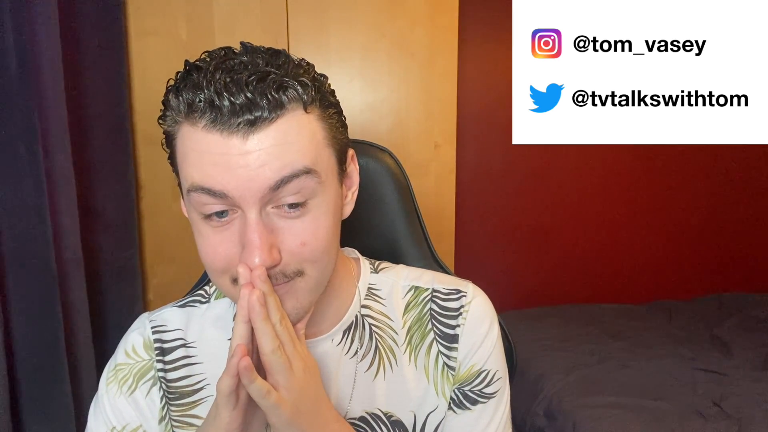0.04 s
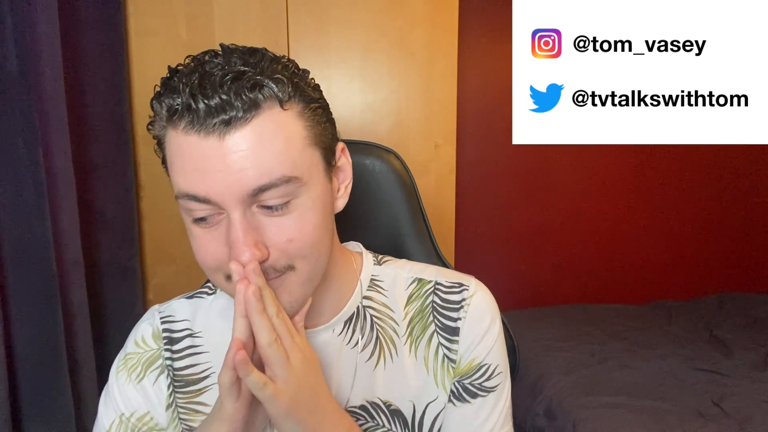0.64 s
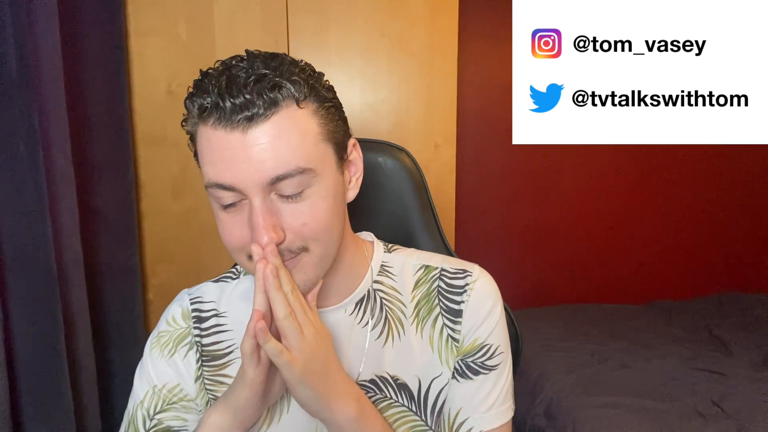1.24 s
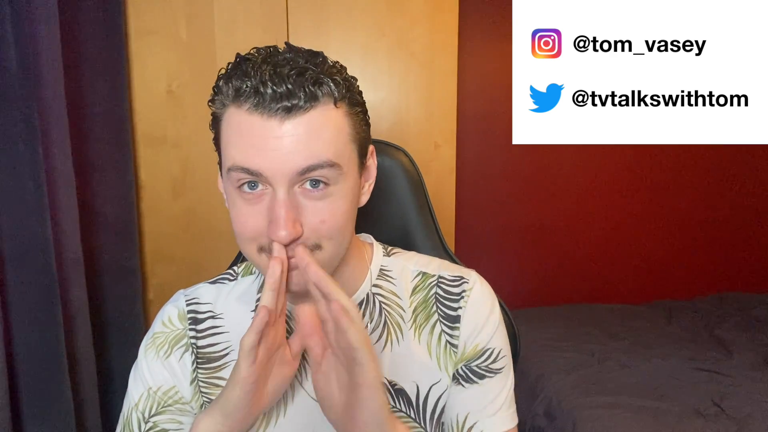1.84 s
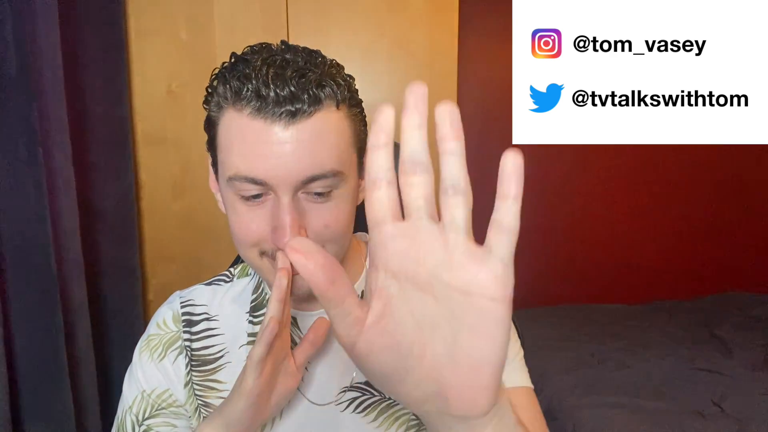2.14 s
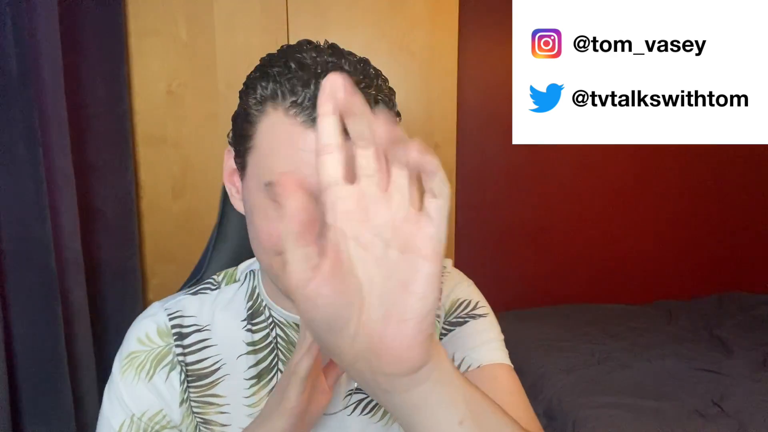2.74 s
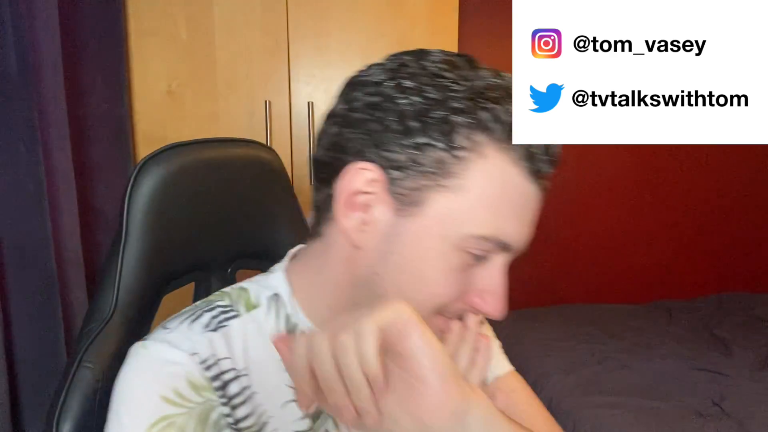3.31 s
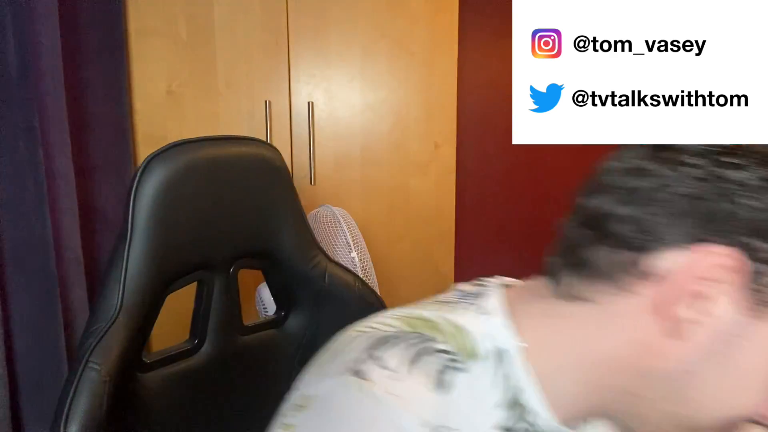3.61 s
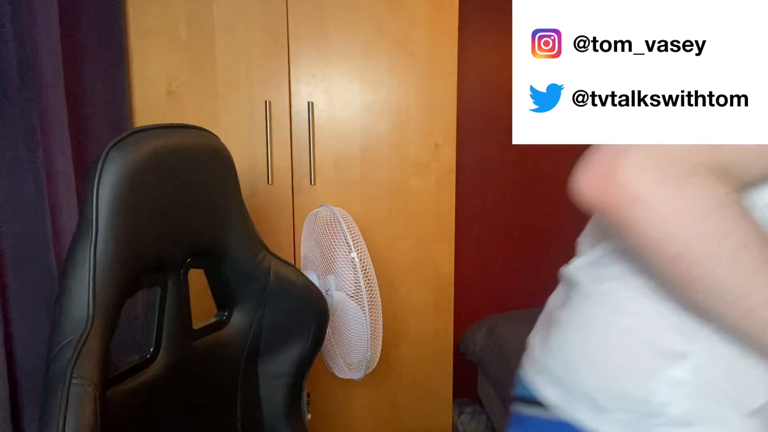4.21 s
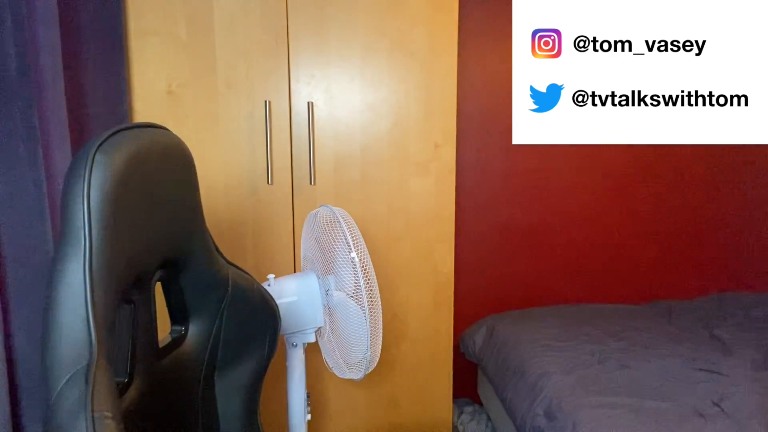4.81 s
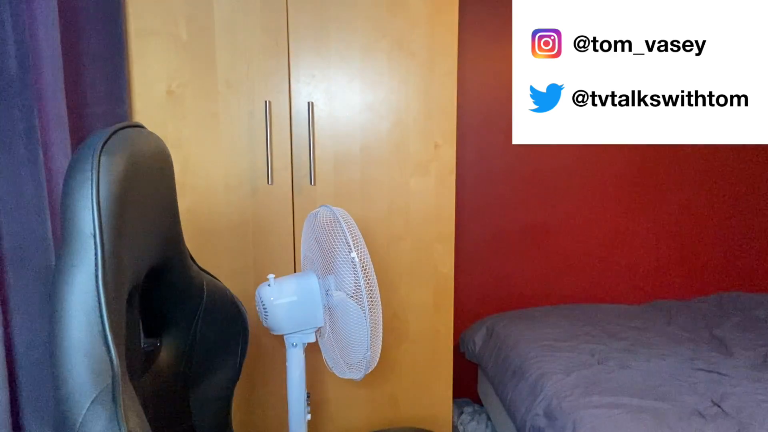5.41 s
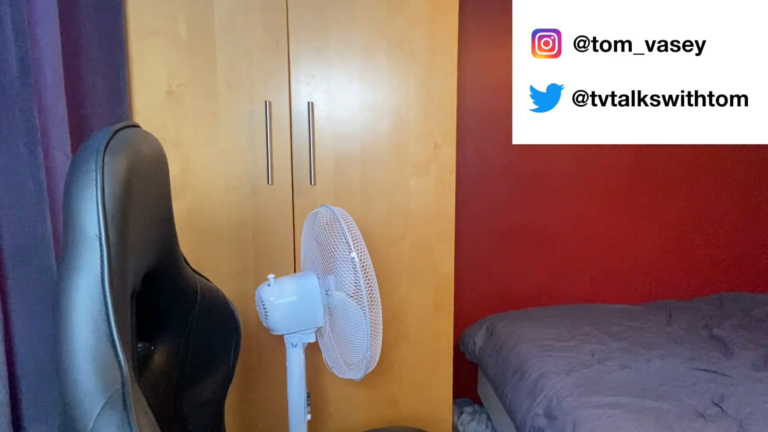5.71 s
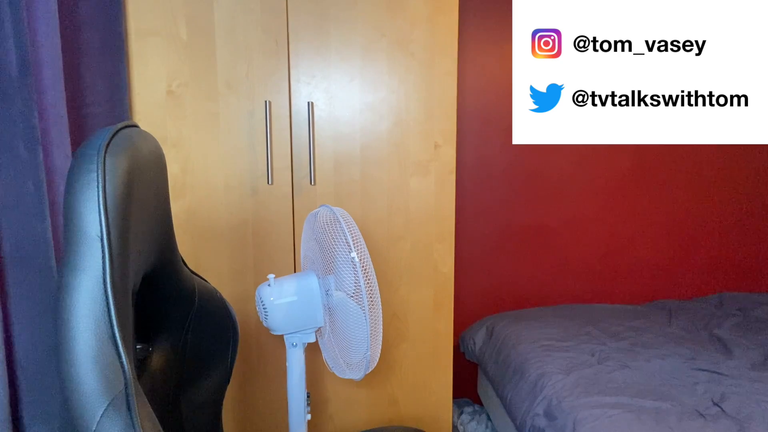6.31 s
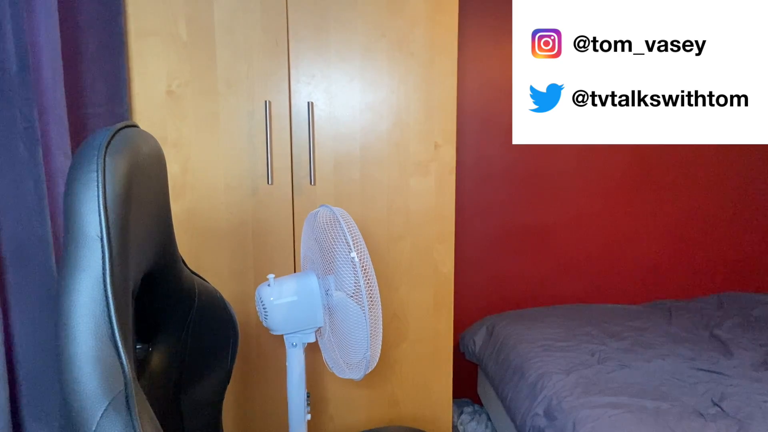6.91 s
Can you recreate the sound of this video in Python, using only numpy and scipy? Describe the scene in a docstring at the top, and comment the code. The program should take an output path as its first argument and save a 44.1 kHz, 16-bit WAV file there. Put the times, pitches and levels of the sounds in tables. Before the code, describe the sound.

A padded swivel chair ticks, creaks and thumps as someone gets up, with rustling clothes, soft steps and one sharp click.

```python
"""Rising from a swivel chair

In a small bedroom a sitter shifts on a padded chair: the frame ticks, the seat creaks, clothes rustle.
As the sitter slides off, the seat thumps on its stop and the tilt spring slips in a slowing run of
metallic ticks. Soft knocks and steps follow, with one sharp click. Hiss, a faint whine and a low
rumble lie underneath."""
import sys
import numpy as np
from scipy import signal
from scipy.fft import rfft, irfft, next_fast_len
from scipy.io import wavfile
from scipy.ndimage import map_coordinates

SR = 44100
rng = np.random.default_rng(int(sys.argv[2]) if len(sys.argv) > 2 else 0)


def to_wav(s):
    """Save 16-bit WAV."""
    ch = np.atleast_2d(s).T  # columns
    pcm = np.round(np.clip(ch, -1, 1) * 32767)  # PCM
    wavfile.write(sys.argv[1], SR, pcm.astype(np.int16))


N = 315315


def amp(db):
    """Decibels to gain."""
    return 10 ** (np.asarray(db) / 20)


def unit(x):
    """Scale to rms 1."""
    return x / np.sqrt(np.mean(x ** 2) + 1e-20)


def along(points, hz):
    """Interpolate (freq_hz, value) points on a log axis."""
    freq_hz, values = np.transpose(points)
    return np.interp(np.log(hz + 1), np.log(freq_hz + 1), values)


def curve(points):
    """Interpolate (time_s, value) points at every sample."""
    time_s, values = np.transpose(points)
    return np.interp(np.arange(N) / SR, time_s, values)


def wobble(rate_hz):
    """Smooth random curve through rate_hz knots a second."""
    knots = rng.standard_normal(int(N * rate_hz / SR) + 4)
    return map_coordinates(knots, [np.arange(N) * rate_hz / SR])


def swells(rows):
    """Envelope of bell-shaped strokes, summed in power."""
    t = np.arange(0, N, 64) / SR
    power = sum(amp(db) ** 2 * np.exp(-((t - mid_s) / half_s) ** 2) for mid_s, half_s, db in rows)
    return np.interp(np.arange(N) / SR, t, np.sqrt(power))


def filtered(x, response):
    """Apply a gain given as a function of frequency."""
    size = next_fast_len(len(x) + SR // 2)
    return irfft(rfft(x, size) * response(np.fft.rfftfreq(size, 1 / SR)), size)[:len(x)]


def coloured(x, spectrum):
    """Shape x by a (freq_hz, gain_db) spectrum; rms 1."""
    return unit(filtered(x, lambda hz: amp(along(spectrum, hz))))


def shelf(x, edge_hz, low_db, high_db):
    """Separate gains below and above an edge."""
    low = signal.sosfilt(signal.butter(1, edge_hz, fs=SR, output="sos"), x)
    return amp(low_db) * low + amp(high_db) * (x - low)


def causal(gain):
    """Minimum-phase impulse with this gain per frequency; energy 1."""
    cepstrum = irfft(np.log(gain + 1e-6))
    size = len(cepstrum)
    folded = np.r_[0, 2 * cepstrum[1:size // 2]]
    response = irfft(np.exp(rfft(folded, size)))
    return response / np.linalg.norm(response)


def ring(modes, scatter_db, size=8192):
    """Impulse response of resonances, their strengths redrawn at each call."""
    hz = np.fft.rfftfreq(size, 1 / SR) + 1
    power = 0
    for mode_hz, width_hz, db in modes:
        detuning = (mode_hz ** 2 - hz ** 2) / (hz * width_hz)
        power += amp(db + scatter_db * rng.normal()) ** 2 / (1 + detuning ** 2)
    return causal(np.sqrt(power))


def impulse(spectrum, size=8192):
    """Impulse with a (freq_hz, gain_db) spectrum."""
    return causal(amp(along(spectrum, np.fft.rfftfreq(size, 1 / SR))))


def contact(t60_s, chatter, size=8192):
    """One push, then dying chatter; energy 1."""
    burst = rng.standard_normal(size) * amp(-60 * np.arange(size) / SR / t60_s)
    burst *= chatter / np.linalg.norm(burst)
    burst[0] += 1
    phase = np.angle(rfft(burst))
    burst = irfft(np.exp(1j * phase))[:size // 2]  # flat spectrum
    return burst / np.linalg.norm(burst)


def add(track, start_s, sound):
    """Mix a sound into the track."""
    part = track[max(round(start_s * SR), 0):][:len(sound)]
    part += sound[:len(part)]


def room(direct, wet_db, size=12288):
    """Direct push plus the bedroom's noise tail; each frequency dies at its own rate."""
    # room decay: freq_hz, t60_s
    decay = [(100, 0.38), (500, 0.14), (2000, 0.19), (9000, 0.19), (16000, 0.14)]
    hz, t, bins = signal.stft(rng.standard_normal(size), SR, nperseg=256)
    tail = signal.istft(bins * amp(-60 * t / along(decay, hz)[:, None]), SR, nperseg=256)[1]
    tail = soften(tail, attack_s=0.0011)
    tail *= amp(wet_db) / np.linalg.norm(tail)
    add(tail, 0, direct)
    return tail


def soften(x, attack_s):
    """Round off the onset."""
    return x * (1 - np.exp(-np.arange(len(x)) / SR / attack_s))


def friction(spectrum, grain_db, flutter_db, flutter_hz):
    """Countless tiny catches of uneven size, in clumps; rms 1."""
    catches = rng.standard_normal(N) * amp(grain_db * wobble(1500) + flutter_db * wobble(flutter_hz))
    return coloured(catches, spectrum)


def background(whine_hz=945, whine_db=-78):
    """Steady hiss and a thin electrical whine."""
    # noise floor: freq_hz, density_db_per_hz
    floor = [(15, -100), (30, -83), (50, -83), (75, -96), (150, -96), (360, -107), (900, -110),
             (2000, -111), (7000, -115), (15800, -116)]
    hiss = filtered(rng.standard_normal(N), lambda hz: amp(along(floor, hz)) * np.sqrt(SR / 2))
    whine = np.sin(2 * np.pi * np.cumsum(whine_hz + 1.61 * wobble(6)) / SR)
    return hiss + amp(whine_db) * whine


def rumble(sway_hz=44, lumpy_db=2):
    """Movement stirs a deep rumble; the floor heaves under the shifting weight."""
    # rumble envelope: time_s, level_db
    levels = [(0, -70), (0.15, -50.5), (0.31, -60.5), (0.6, -46), (0.98, -57.5), (1.13, -49), (1.6, -65.5),
              (2.2, -47), (2.5, -59.5), (3.5, -54.5), (3.72, -36), (4.06, -33), (4.35, -45), (4.72, -54),
              (4.9, -36.5), (5.33, -51), (5.45, -38), (5.62, -50), (6.4, -58.5), (7.15, -60)]
    # floor heaves: mid_s, half_length_s, level_db
    heaves = [(0.633, 0.019, -40), (3.772, 0.014, -23), (3.888, 0.027, -16), (4.008, 0.025, -18),
              (4.876, 0.024, -29.5), (6.15, .02, -35.5)]
    # rumble colour: freq_hz, gain_db
    spectrum = [(15, -23), (26, -2.5), (36, 2), (50, -2), (62, -12), (85, -32.5), (200, -67)]
    stir = signal.hilbert(coloured(rng.standard_normal(N), spectrum))
    sway = unit(stir.real / np.sqrt(0.55 + np.abs(stir) ** 2))  # peaks limited
    out = amp(curve(levels) + lumpy_db * wobble(13)) * sway
    for mid_s, half_s, db in heaves:
        t = np.arange(N) / SR - mid_s
        out += amp(db) * np.exp(-(t / half_s) ** 2) * np.cos(2 * np.pi * sway_hz * t)
    return out


def rustle(cloth_db=-12, nudge_db=-4.5):
    """The sitter's effort rubs upholstery, brushes cloth and stirs the chair; single strokes stand out."""
    # effort against the chair: time_s, level_db
    efforts = [(0, -89), (0.54, -55.5), (1.0, -70.5), (1.2, -70), (1.36, -59.5), (1.58, -80), (1.9, -66.5),
               (2.3, -68.5), (2.66, -81.5), (3.12, -58.5), (3.35, -63.5), (3.98, -46), (4.1, -54.5),
               (4.22, -51.5), (4.35, -63), (4.95, -64), (5.2, -71.5), (5.45, -61), (5.72, -76), (5.92, -63),
               (6.45, -74.5), (7.15, -72.5)]
    # cloth-on-cloth strokes: mid_s, half_length_s, level_db
    swishes = [(0.25, 0.08, -73), (0.42, 0.019, -64), (1.31, 0.052, -65), (1.44, 0.04, -60.5),
               (1.92, 0.07, -65.5), (3.15, 0.034, -58.5), (3.45, 0.34, -67), (3.71, 0.014, -46),
               (3.88, 0.17, -57.5), (4.75, 0.092, -64.5), (4.96, 0.061, -62.5), (5.36, 0.037, -61),
               (5.48, 0.061, -63.5), (5.665, 0.037, -69), (5.895, 0.036, -61.5), (6.19, 0.092, -65),
               (6.84, 0.057, -61), (7.14, 0.027, -66)]
    # body against desk and seat: mid_s, half_length_s, level_db
    nudges = [(1.09, 0.046, -58), (1.41, 0.067, -54.5), (2.9, 0.012, -53), (3.175, 0.056, -53),
              (4.02, 0.044, -38), (6.15, 0.04, -58)]
    # rubbed upholstery: freq_hz, gain_db
    upholstery_colour = [(40, -10), (90, -4.5), (145, 7), (200, -2.5), (255, 4.5), (400, -1), (800, -2.5),
                         (1500, -5.5), (3000, -14.5), (8000, -32.5)]
    # brushed cloth: freq_hz, gain_db
    cloth_colour = [(400, -16), (1200, 0.5), (2500, 5), (4500, -0.5), (6500, 0), (8500, -3.5), (11500, -8),
                    (16000, -19)]
    # dull hum of a nudge: freq_hz, gain_db
    nudge_colour = [(70, -21), (115, 1.5), (146, 11), (165, 0.5), (190, -10), (250, -4.5), (320, -14.5),
                    (600, -34.5)]
    effort = amp(curve(efforts))
    rub = friction(upholstery_colour, grain_db=2, flutter_db=1.7, flutter_hz=60)
    cloth = friction(cloth_colour, grain_db=1.5, flutter_db=1.26, flutter_hz=100)
    hum = coloured(rng.standard_normal(N), nudge_colour)
    cloth_gain = np.hypot(swells(swishes), amp(cloth_db) * effort)
    hum_gain = np.hypot(swells(nudges), amp(nudge_db) * effort)
    return effort * rub + cloth_gain * cloth + hum_gain * hum


def slide(full_s=3.662, free_s=3.705, level_db=-35, rise_db_per_s=170, fall_db_per_s=520):
    """Drag on the cushion builds, holds and stops as the sitter comes free."""
    # dragged cushion: freq_hz, gain_db
    cushion = [(50, -6), (130, 9.5), (260, -3.5), (420, -8), (680, -4), (1100, -12), (1600, -12),
               (3000, -28.5), (8000, -37), (16000, -71)]
    t = np.arange(N) / SR
    db = level_db - rise_db_per_s * np.maximum(full_s - t, 0) - fall_db_per_s * np.maximum(t - free_s, 0)
    return amp(db) * friction(cushion, grain_db=3, flutter_db=1.5, flutter_hz=150)


def creaks(jitter=0.28):
    """Fast, uneven stick-slip rings the seat."""
    # creaks: start_s, length_s, level_db, slip_rate_hz, treble_db
    events = [(0.39, 0.073, -66, 500, -4), (0.517, 0.029, -49.5, 470, -7), (3.974, 0.014, -46, 600, -1),
              (4.995, 0.014, -45.5, 700, 0), (5.012, 0.015, -49.5, 360, 2)]
    # seat resonances: freq_hz, width_hz, gain_db
    modes = [(890, 590, -5), (1493, 27, 11), (1740, 93, 2), (1940, 81, 4.5), (2590, 60, 5),
             (3320, 200, -2.5), (4400, 680, -8), (5120, 620, -9.5), (7440, 840, -13.5), (12000, 4000, -30)]
    out = np.zeros(N)
    for start_s, length_s, db, rate_hz, treble_db in events:
        gaps, sizes = rng.standard_normal((2, 64))
        slip_s = np.r_[0, np.cumsum(np.exp(jitter * gaps[1:]))] / rate_hz
        slips = np.bincount((slip_s * SR).astype(int), amp(2 * sizes) * (slip_s < length_s))
        drive = room(slips / np.linalg.norm(slips), wet_db=-2.5)
        creak = signal.fftconvolve(drive, ring(modes, scatter_db=1.5))
        creak = shelf(creak, edge_hz=6000, low_db=0, high_db=treble_db)
        add(out, start_s, amp(db) * np.sqrt(length_s * SR) * creak)
    return out


def frame():
    """The plastic frame ticks as its load shifts."""
    # frame ticks: start_s, level_db, treble_db
    ticks = [(0.384, -24.5, -22), (0.496, -23, -12), (0.681, -25, 2.5), (0.731, -30, -9), (0.766, -31, -16),
             (0.805, -28, -21), (0.849, -26.5, -12), (0.903, -25, -6.5), (1.1784, -21, 2),
             (3.054, -34, -17), (3.8202, -21.5, 3.5)]
    # frame resonances: freq_hz, width_hz, gain_db
    modes = [(730, 520, 3), (1680, 200, -2), (2180, 260, 3), (3060, 570, -4), (4500, 730, -6.5),
             (7300, 940, -5), (11600, 3000, -30)]
    out = np.zeros(N)
    for start_s, db, treble_db in ticks:
        plastic = shelf(ring(modes, scatter_db=2.5), edge_hz=2600, low_db=0, high_db=treble_db)
        push = room(contact(t60_s=0.031, chatter=1), wet_db=-2.5)
        add(out, start_s, amp(db) * signal.fftconvolve(push, plastic))
    return out


def click(start_s=5.7453, level_db=-6):
    """One hard, bright click with a brief rattle."""
    # click colour: freq_hz, gain_db
    spectrum = [(100, -10), (450, -8.5), (1000, -0.5), (1300, 1.5), (1620, 3.5), (2200, -5), (3500, 0.5),
                (5000, -6), (6500, -12), (8000, 2), (9050, 5.5), (10400, 1), (11500, -8), (16000, -8)]
    out = np.zeros(N)
    blow = contact(t60_s=0.006, chatter=5)
    rattle = amp(-8) * contact(t60_s=0.03, chatter=10)
    push = room(blow + rattle, wet_db=-4.5)
    add(out, start_s, amp(level_db) * signal.fftconvolve(push, impulse(spectrum)))
    return out


def knocks():
    """Padded blows ring chair and floor, each with a short scuff."""
    # chair knocks and footfalls: start_s, level_db, scuff_re_blow_db
    events = [(0.493, -15.5, -11), (1.006, -31, -2), (1.075, -24.5, -10), (1.407, -12, -11),
              (2.015, -25.5, -6.5), (2.04, -27.5, -6.5), (2.155, -31.5, 0), (2.327, -35.5, 2.5),
              (2.459, -32.5, -1), (2.52, -31.5, -2.5), (2.744, -40, 11.5), (2.996, -24.5, -3.5),
              (3.465, -23, -1.5), (3.703, -2.5, -8), (3.908, -15, -1), (4.104, -8.5, -25),
              (4.302, -18.5, -13), (4.464, -13.5, -4.5), (4.518, -17.5, -1), (4.589, -23, -2.5),
              (4.669, -16, -9.5), (4.742, -25.5, 0.5), (5.025, -16, -13), (5.164, -23, -4),
              (5.292, -18.5, -8.5), (5.451, -25.5, -5.5), (5.872, -23.5, 0), (5.961, -26, -1.5),
              (6.094, -22.5, -19), (6.346, -26, -4), (6.517, -24, -8)]
    # chair and floor resonances: freq_hz, width_hz, gain_db
    modes = [(145.4, 28.5, 4), (233, 39, 0.5), (274.6, 40, 0), (327, 53, -3), (450, 170, -13)]
    # scuff colour: freq_hz, gain_db
    scuff_colour = [(200, -7.5), (400, 1.5), (650, -2), (950, -2), (1500, -6), (2500, -14), (5000, -24.5),
                    (14000, -27.5)]
    out = np.zeros(N)
    for start_s, db, scuff_db in events:
        blow = signal.fftconvolve(room([1], wet_db=-5.5), ring(modes, scatter_db=1.5))
        scrape = room(contact(t60_s=0.047, chatter=7.3), wet_db=-4)
        scuff = signal.fftconvolve(scrape, impulse(scuff_colour))
        add(out, start_s, amp(db) * soften(blow + amp(scuff_db) * scuff, attack_s=0.003))
    return out


def thump(start_s=3.948, level_db=5.5):
    """The seat meets its stop in one round thump."""
    # thump colour: freq_hz, gain_db
    spectrum = [(40, -13), (90, -8.5), (150, -0.5), (195, -5.5), (255, -1.5), (330, -15), (450, -24),
                (1000, -35.5), (4000, -74)]
    out = np.zeros(N)
    add(out, start_s, amp(level_db) * signal.fftconvolve(room([1], wet_db=-8), impulse(spectrum)))
    return out


def spring_rush(count=40):
    """Slips crowd together, then thin out as the seat swings; rows of start_s, level_db, body_db."""
    start_s, fastest_s, end_s = 3.85, 3.945, 4.035
    peak_rate_hz, half_width_s = 150, 0.045
    fastest_db, growth_db_per_s, body_db = -23, 40, 5.5
    t = np.linspace(start_s, end_s, SR // 10)
    rate_hz = peak_rate_hz / (1 + ((t - fastest_s) / half_width_s) ** 2)
    slips_passed = np.cumsum(rate_hz) * (t[1] - t[0])
    jitter, sizes = rng.standard_normal((count, 2)).T
    slip_s = np.interp(np.arange(count) + 0.1 * jitter, slips_passed, t)
    slip_db = fastest_db + growth_db_per_s * np.minimum(slip_s - fastest_s, half_width_s) + 1.1 * sizes
    return [(s, db, body_db) for s, db in zip(slip_s, slip_db) if s < end_s]


def spring(echo_s=0.008, echo_db=-11):
    """Each slip of the tilt spring rings the steel mechanism; a near wall repeats it."""
    # single slips: start_s, level_db, body_re_treble_db
    ticks = [(3.7858, -20, -18), (4.009, -14.5, 4.5), (4.0452, -14, 0.5), (4.0639, -17, 5.5),
             (4.0839, -16, 2), (4.1102, -14.5, 0.5), (4.1378, -14, 1.5), (4.1784, -13.5, 3),
             (4.256, -12, 3), (4.386, -12, 0.5), (4.5765, -29, -0.5)]
    # mechanism resonances: freq_hz, width_hz, gain_db
    modes = [(1280, 116, 2), (1607, 180, -0.5), (2330, 390, -10.5), (3060, 220, -3.5), (4110, 610, -3),
             (5330, 170, -27), (8520, 470, -6), (9170, 430, -1.5), (10430, 280, -3), (13500, 1100, -14.5)]
    out = np.zeros(N)
    for start_s, db, body_db in ticks + spring_rush():
        push = contact(t60_s=0.0095, chatter=2.02)
        add(push, echo_s, amp(echo_db) * contact(t60_s=0.008, chatter=3))
        steel = shelf(ring(modes, scatter_db=2), edge_hz=4560, low_db=body_db, high_db=0)
        add(out, start_s, amp(db) * signal.fftconvolve(room(push, wet_db=-6.5), steel))
    return out


def scene():
    """All sources, one channel."""
    contacts = frame() + creaks() + knocks() + thump() + click()
    return (contacts + rustle() + slide() + rumble() + background() + spring())[None]


def record(dry):
    """Brick-wall low-pass."""
    cutoff_hz = 15750
    return filtered(dry[0], lambda hz: hz < cutoff_hz)[None]


dry = scene()
out = record(dry)
to_wav(out)
```